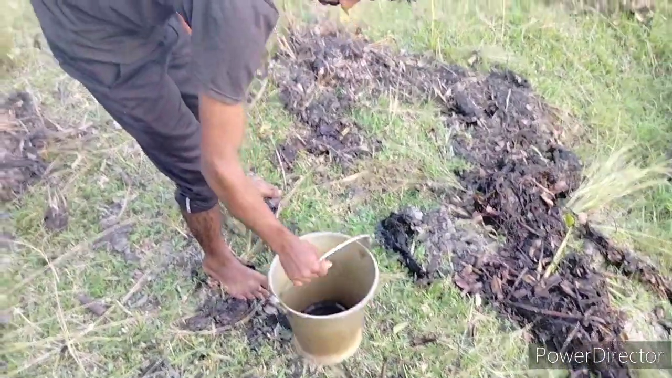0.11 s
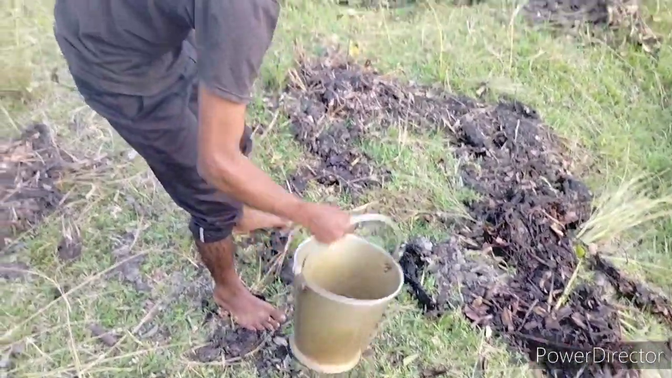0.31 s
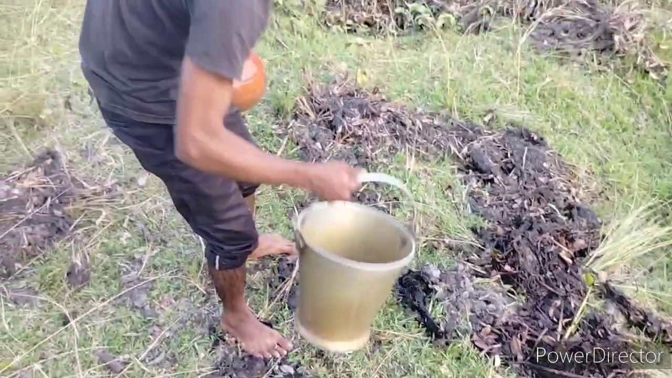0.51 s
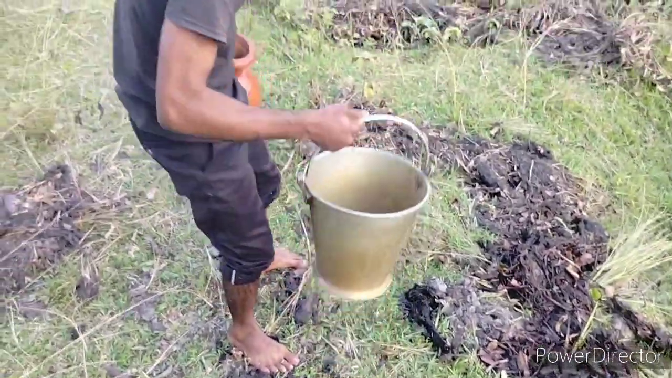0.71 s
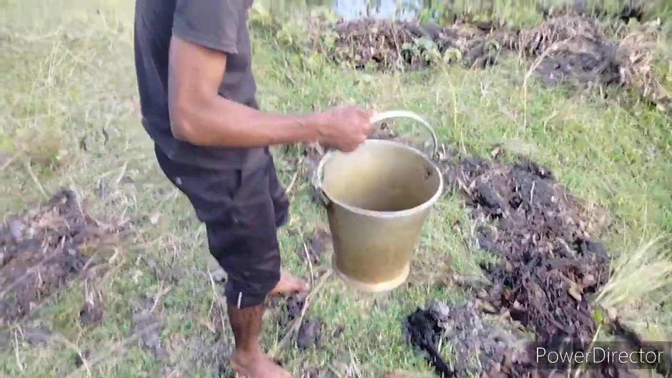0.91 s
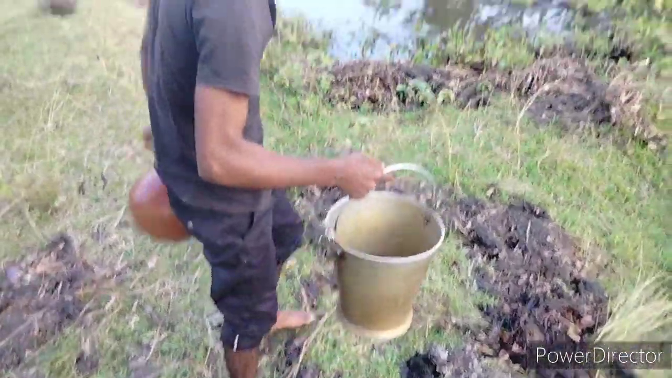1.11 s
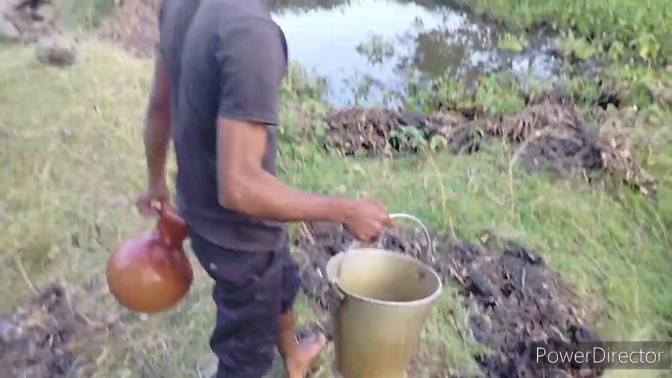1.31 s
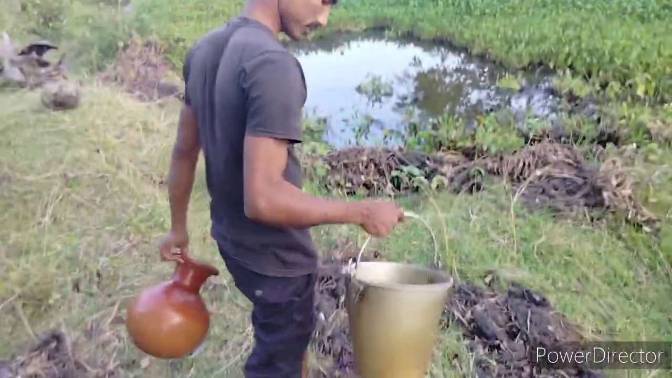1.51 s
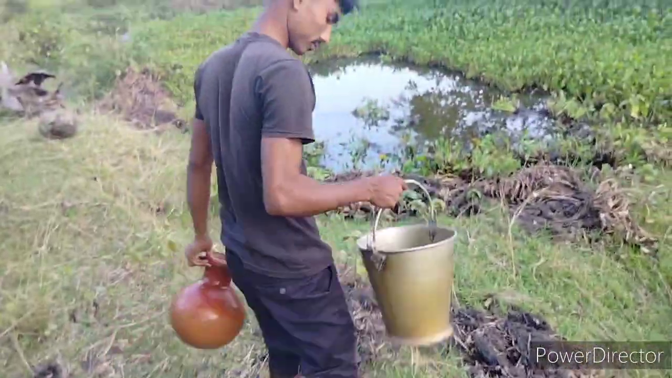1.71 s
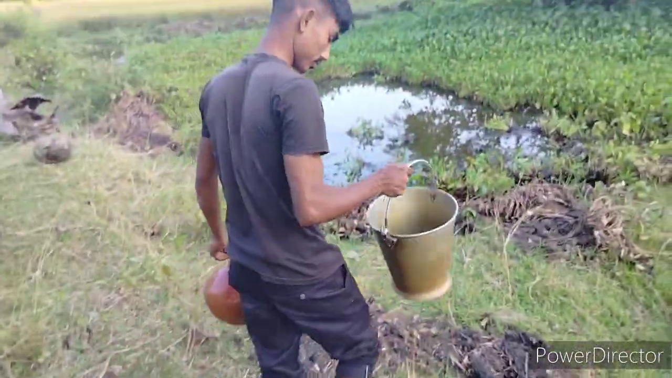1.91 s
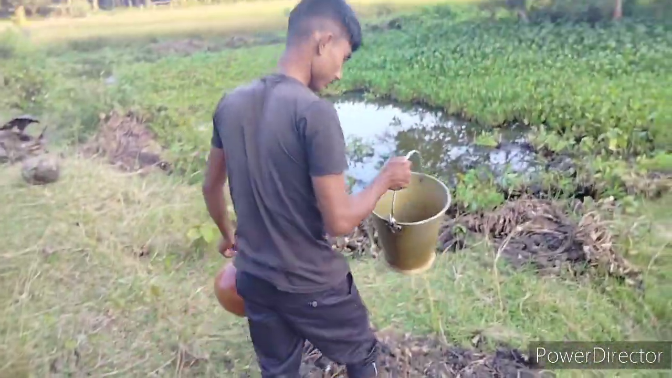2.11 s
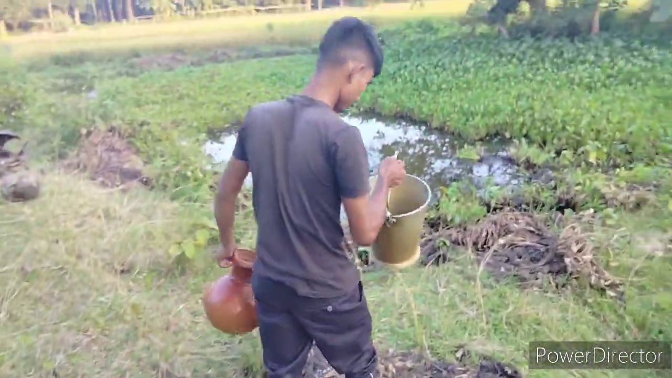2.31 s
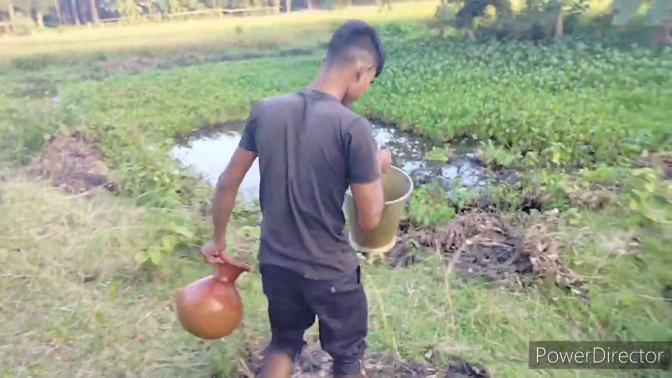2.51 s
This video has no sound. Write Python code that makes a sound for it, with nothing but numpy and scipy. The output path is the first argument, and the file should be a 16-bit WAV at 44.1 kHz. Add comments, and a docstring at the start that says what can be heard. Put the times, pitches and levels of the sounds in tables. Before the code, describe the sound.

Close up outdoors, a tin pail is lifted: soft rasp and low thud, a sharp short clank with a tiny bounce, then light ticks, a thin cricket, buzzing insects and a faint falling bird whistle.

```python
"""A tin pail is lifted off the grass near a phone, beside a pond. First its wire handle scrapes and squeals in the
lugs and the pail thuds low (grains ringing the pail, rasp, narrow noise), then the handle snaps tight with a clank
at 0.2 s (decaying modes over a noise crash) and bounces. A thin cricket wavers as a sine until 1.3 s, and small
knocks follow the pail as short resonances. Patchy treble noise swells and fades; a bird whistles three falling
notes from 1.85 s, sines with echoes. Throughout, insects hiss and buzz in shaped noise over a wash and a low hum."""
import sys
import numpy as np
from scipy import signal
from scipy.fft import rfft, irfft, next_fast_len
from scipy.io import wavfile
from scipy.ndimage import uniform_filter1d, map_coordinates

SR = 44100
rng = np.random.default_rng(int(sys.argv[2]) if len(sys.argv) > 2 else 0)


def dump(signal):
    """Clip the signal to [-1, 1] and save it as 16-bit WAV at the path in sys.argv[1]."""
    limited = np.clip(np.atleast_2d(signal).T, -1, 1)
    pcm = np.round(limited * 32767).astype(np.int16)
    wavfile.write(sys.argv[1], SR, pcm)


N = 114660  # samples, 2.6 s
TIME = np.arange(N) / SR  # seconds


def amp(db):
    """Decibels to gain."""
    return 10 ** (np.asarray(db) / 20)


def unit(x):
    """Scale to rms 1."""
    return x / np.sqrt(np.mean(x ** 2) + 1e-20)


def along(points, hz):
    """Read (Hz, value) points on a log frequency axis."""
    point_hz, values = np.transpose(points)
    return np.interp(np.log(hz + 1), np.log(point_hz + 1), values)


def curves(rows):
    """One value per sample for each column after the time."""
    seconds, *columns = np.transpose(rows)
    return [np.interp(TIME, seconds, column) for column in columns]


def wobble(rate):
    """A smooth random curve with this many knots a second."""
    knots = rng.standard_normal(int(N * rate / SR) + 4)
    return map_coordinates(knots, [np.arange(N) * rate / SR])


def swell(start, length, sharp):
    """A half-sine envelope raised to a power; a smaller power gives a flatter top."""
    phase = np.clip((TIME - start) / length, 0, 1)
    return np.sin(np.pi * phase).clip(0) ** sharp


def filtered(x, response):
    """Multiply the spectrum of x by a complex response of frequency."""
    size = next_fast_len(N + SR // 2)
    return irfft(rfft(x, size) * response(np.fft.rfftfreq(size, 1 / SR)), size)[..., :N]


def narrow(hz, width_hz):
    """Noise in a bell-shaped band around one frequency, rms 1."""
    return unit(filtered(rng.standard_normal(N), lambda f: np.exp(-((f - hz) / width_hz) ** 2)))


def pan(db):
    """Left and right gains that differ by db."""
    return amp([[db / 2], [-db / 2]])


def ports(x, lean, lead):
    """Split level (dB) and phase (radians) differences between the two microphone ports."""
    side = np.array([[.5], [-.5]])
    return filtered(x, lambda hz: amp(side * along(lean, hz)) * np.exp(1j * side * along(lead, hz)))


CRASH_ALIKE = 0.864  # shared share of power at the two ports


def metal_noise(spectrum):
    """Dense metal modes as coloured noise, a little different at each port."""
    shared, left, right = filtered(rng.standard_normal((3, N)), lambda hz: amp(along(spectrum, hz)))
    own = np.array([left, right])
    return unit(np.sqrt(CRASH_ALIKE) * shared + np.sqrt(1 - CRASH_ALIKE) * own)


# Likeness of open air at the two ports. Each row: frequency in Hz, likeness from 0 to 1.
AIR_ALIKE = [(60, 0.88), (240, 0.69), (950, 0.039)]
# Lean of open air between the ports. Each row: frequency in Hz, left minus right in dB.
AIR_LEAN = [(300, 0.46), (8000, 7.6), (13000, 3.064)]


def rush(spectrum, patchy_db):
    """Outdoor stereo noise with patches of random gain, steadier in the bass, rms 1 in the middle."""
    hz, _, bins = signal.stft(rng.standard_normal((2, N)), SR, nperseg=512)
    patches = uniform_filter1d(rng.standard_normal(bins.shape[1:]), size=2, axis=0)
    patches = unit(uniform_filter1d(patches, size=8, axis=1))
    steadier_bass = (hz / (hz + 300))[:, None]
    pair = signal.istft(bins * amp(patchy_db * patches * steadier_bass), nperseg=512)[1][:, :N]

    def mid_and_side(hz):
        turn = np.arccos(np.clip(along(AIR_ALIKE, hz), 0, 1)) / 2
        return amp(along(spectrum, hz)) * [np.cos(turn), np.sin(turn)]

    mid, side = filtered(pair, mid_and_side)
    both = ports(np.array([mid + side, mid - side]), AIR_LEAN, [(1, 0)])
    return both / np.std(both.mean(axis=0))


RISE_S = 0.00064  # time constant of a blow's onset


def ring(modes, scatter_db):
    """One blow excites decaying sine modes, each with a random change of level."""
    t = np.arange(SR // 2) / SR
    out = np.zeros(len(t))
    for hz, db, t60 in modes:
        level_db = db + scatter_db * rng.standard_normal()
        out += amp(level_db - 60 * t / t60) * np.sin(2 * np.pi * hz * t)
    return out * (1 - np.exp(-t / RISE_S))


# Handle striking the lugs. Each row: start in seconds, handle ring, pail ring and crash levels in dB.
BLOWS = [(0.028, -69, -50.5, -61), (0.138, -66, -54, -54.5), (.183, -52, -48, -42.5),
         (0.2029, -32.5, -59, -43.5), (0.2053, -10, -36.5, -16.5), (0.2125, -19, -51, -27),
         (0.246, -41.5, -43.5, -35)]
# Wire handle modes. Each row: frequency in Hz, relative level in dB, 60 dB decay in seconds.
HANDLE = [(3796, -21.5, 0.0628), (4876, 0, 0.03), (5188, -14, .03), (5754, -5, 0.038), (6098, -3, 0.022),
          (7350, -5, .03), (8300, -9, .02), (12683, -20, 0.021), (14715, -26, .045)]
# Pail modes. Each row: frequency in Hz, relative level in dB, 60 dB decay in seconds.
PAIL = [(994.6, -5.5, 0.1), (1080, -0.5, 0.081), (1406.7, 1.5, 0.0747), (1460, -5, 0.052),
        (1676, -1, 0.065), (2005.7, -3, 0.077), (2117.4, -1, .12), (2238, 1.5, 0.079)]
# Colour of the clank's dense modes. Each row: frequency in Hz, relative level in dB.
CRASH = [(250, -60.5), (722, -41.5), (1400, -14.5), (4120, -20.5), (4860, -3.5), (7540, -10.5),
         (9580, -24.5), (15100, -30), (16000, -62)]
CRASH_T60, CRASH_TAIL_T60, CRASH_TAIL_DB = 0.035, 0.14, -22  # seconds, seconds, dB under the first decay


def blows():
    """Each blow rings handle and pail modes over a two-stage decaying crash of dense modes."""
    rings, crash_gain = np.zeros(N + SR), np.zeros(N + SR)
    t = np.arange(SR // 2) / SR
    crash_decay = amp(-60 * t / CRASH_T60) + amp(CRASH_TAIL_DB - 60 * t / CRASH_TAIL_T60)
    for start, handle_db, pail_db, crash_db in BLOWS:
        span = slice(round(start * SR), round(start * SR) + len(t))
        rings[span] += amp(handle_db) * ring(HANDLE, scatter_db=0.5)
        rings[span] += amp(pail_db) * ring(PAIL, scatter_db=3)
        crash_gain[span] += amp(crash_db) * crash_decay
    return rings[:N] + crash_gain[:N] * amp(3 * wobble(250)) * metal_noise(CRASH)


# Handle rubbing in the lugs. Each row: time in seconds, excited pail level in dB, rasp level in dB.
SCRAPE = [(.02, -62.5, -62.5), (.032, -54, -62), (.16, -50, -58), (.26, -51, -46), (.3, -56, -61.5),
          (.45, -78.5, -83.5)]
# Colour of the rasp. Each row: frequency in Hz, relative level in dB.
RASP = [(600, -18.5), (2300, -1), (7500, -9), (15000, -27.5)]


def scrape():
    """Rubbing grains excite the pail modes while rough metal noise rasps."""
    body_db, rasp_db = curves(SCRAPE)
    grains = rng.standard_normal(N) * amp(8.3 * wobble(120))
    body = unit(signal.fftconvolve(grains, ring(PAIL, scatter_db=2.5))[:N])
    rasp = amp(rasp_db + 2.9 * wobble(150)) * metal_noise(RASP)
    rubbing = np.arange(N) < SCRAPE[-1][0] * SR
    return (amp(body_db) * body + rasp) * rubbing


# Squeals of the wire and low thuds of the pail.
# Each row: start in seconds, length in seconds, pitch in Hz, level in dB.
SQUEALS_AND_THUDS = [(0.011, 0.029, 5770, -58), (0.0392, 0.0482, 2790, -56), (0.1095, 0.051, 2230, -47.5),
                     (0.138, 0.04, 2000, -45.5), (0.122, 0.04, 265, -64.5), (.18, .034, 275, -56.5),
                     (0.0228, 0.039, 1382, -55), (0.0814, 0.103, 5330, -61.5), (0.176, 0.015, 1020.8, -44),
                     (0.3315, 0.0584, 5416, -65)]
BLUR = 0.039  # width as a share of the pitch


def squeals_and_thuds():
    """The wire squeals and the pail thuds low, in short bands of narrow noise."""
    return sum(amp(db) * swell(start, length, sharp=0.32) * narrow(hz, BLUR * hz)
               for start, length, hz, db in SQUEALS_AND_THUDS)


# Swinging wire. Each row: time in seconds, lower pail mode in dB, upper pail mode in dB.
SING = [(.2455, -43, -38), (0.283, -57, -55), (.297, -41.5, -50.5), (.325, -62.5, -39.5),
        (.345, -72, -67.5), (.4, -79, -67)]


def sing():
    """The swinging wire keeps the two lowest pail modes sounding, so they beat."""
    t = TIME - SING[0][0]
    swinging = (t > 0) * (t < SING[-1][0] - SING[0][0])
    # zip pairs the two level curves with the first two modes
    tones = sum(amp(db) * np.sin(2 * np.pi * mode[0] * t) for db, mode in zip(curves(SING), PAIL))
    return tones * swinging


# Direction of the pail near the microphone. Each row: frequency in Hz, left minus right in dB.
LEAN = [(300, -1.5), (2400, 0), (4800, 6), (8000, -3.5), (13000, 1.5)]
# Phase between the ports for the pail. Each row: frequency in Hz, left minus right in radians.
LEAD = [(900, -0.85), (2500, -1.16), (4400, 0.81), (7000, 1.49)]


def pail():
    """Blows, rubbing, squeals, thuds and the beating ring reach both ports from one direction."""
    return ports(blows() + scrape() + squeals_and_thuds() + sing(), LEAN, LEAD)


# Small ticks and taps. Each row: start in seconds, level in dB, resonance in Hz, left minus right in dB.
TICKS = [(.56, -58, 328, 0.5), (.597, -58.5, 1887, -7.5), (.673, -41.5, 2257, 5), (.674, -43.5, 2872, -10),
         (.68, -51, 5604, 16.5), (0.786, -57, 1450, -7.5), (.904, -47.5, 2333, -11),
         (1.034, -55.5, 301.7, 2.5), (1.186, -58.5, 1995, -2.5), (1.383, -61.5, 1094, 10),
         (1.384, -59, 1824, 3.5), (2.376, -53.5, 529.4, -10.5), (2.451, -51.5, 5600, 13.5)]
TICK_T60, TICK_SHORTENS = 0.0468, 0.197  # seconds at 1 kHz; exponent towards the treble
TICK_NOISE = 0.563  # depth of the random roughness


def ticks():
    """Short rough knocks with one decaying resonance each, shorter when higher."""
    out, t = np.zeros((2, N + SR)), np.arange(SR // 4) / SR
    for start, db, hz, pan_db in TICKS:
        rough = 1 + TICK_NOISE * wobble(0.5863 * hz)[:len(t)]
        decay = amp(db - 60 * t / TICK_T60 * (hz / 1000) ** TICK_SHORTENS)
        tick = decay * np.sin(2 * np.pi * hz * t) * rough * (1 - np.exp(-t / 0.00125))
        first = round(start * SR)
        out[:, first:first + len(t)] += pan(pan_db) * tick
    return out[:, :N]


# Bird whistles. Each row: start in seconds, length in seconds, final pitch in Hz, level in dB.
WHISTLES = [(1.854, .1, 1898, -67), (2.134, 0.095, 1873, -66), (2.427, 0.0904, 1825, -69)]
DROP_HZ, DROP_S, WHISTLE_PAN_DB = 260.8, .035, 7.5  # fall in pitch, its time constant, left minus right


def bird():
    """Whistles fall exponentially to their final pitch, blurred by echoes in decaying noise."""
    notes = np.zeros(N)
    for start, length, hz, db in WHISTLES:
        pitch = hz + DROP_HZ * np.exp(-np.abs(TIME - start) / DROP_S)
        level = amp(db - 60 * (TIME - start).clip(0) + 3.5 * wobble(90))
        notes += level * swell(start, length, sharp=0.12) * np.sin(2 * np.pi * np.cumsum(pitch) / SR)
    tail = rng.standard_normal((2, SR // 4)) * amp(-60 * TIME[:SR // 4] / 0.15)
    tail /= np.linalg.norm(tail[0])
    echo = signal.fftconvolve(notes[None], tail, axes=1)[:, :N]
    return pan(WHISTLE_PAN_DB) * (notes + amp(1) * echo)


# Faint far notes. Each row: start in seconds, length in seconds, pitch in Hz, level in dB.
NOTES = [(0.415, 0.229, 433.3, -74), (0.95, 0.055, 457, -73), (1.296, 0.0528, 923, -70),
         (1.4, 0.07, 1918, -74), (2.259, 0.32, 649, -79.5), (1.735, 0.04, 5650, -72),
         (1.95, .06, 5780, -74), (2.136, 0.0335, 5440, -73), (0.867, 0.0363, 1290, -76.5)]
NOTE_BLUR = 0.0412  # width as a share of the pitch


def far_notes():
    """Faint far notes as narrow noise, their pitch blurred."""
    notes = sum(amp(db) * swell(start, length, sharp=0.27) * narrow(hz, NOTE_BLUR * hz)
                for start, length, hz, db in NOTES)
    return pan(8.13) * notes


# Cricket level. Each row: time in seconds, level in dB.
CRICKET = [(.36, -82), (.5, -73), (1.12, -70.5), (1.15, -86.5), (1.2, -74.5), (1.3, -78)]
CRICKET_HZ, CRICKET_RISE_HZ_PER_S, CRICKET_PAN_DB = 2891, 69, 8


def cricket():
    """A thin sine rises slowly in pitch while pitch and level waver."""
    pitch = CRICKET_HZ + CRICKET_RISE_HZ_PER_S * TIME + 60 * wobble(60)
    level = amp(curves(CRICKET)[0] + 3.2 * wobble(80)) * (TIME < CRICKET[-1][0])
    return pan(CRICKET_PAN_DB) * level * np.sin(2 * np.pi * np.cumsum(pitch) / SR)


# Swells of the buzzing insect. Each row: end in seconds, level in dB.
BUZZ = [(.81, -78), (1.035, -70.5), (1.27, -65), (1.509, -63.5), (2.449, -67), (2.68, -63)]
BUZZ_HZ, BUZZ_WIDTH_HZ, BUZZ_PAN_DB = 10150, 160, 13
BUZZ_RATE, BUZZ_SHARP = 102, .8  # mean pulses a second, peakedness of each pulse
BUZZ_SWELL_S, BUZZ_REST_DB = 0.1463, -82.5  # rise of a swell, level underneath


def buzz():
    """Narrow treble noise pulses quickly; each swell rises and stops short."""
    pulses = np.exp(BUZZ_SHARP * np.cos(2 * np.pi * np.cumsum(BUZZ_RATE + 2 * wobble(5)) / SR))
    level = np.full(N, amp(BUZZ_REST_DB))
    for end, db in BUZZ:
        rise = np.clip(1 + (TIME - end) / BUZZ_SWELL_S, 0, 1) ** 1.02
        stop = np.clip((end - TIME) / 0.00516, 0, 1)
        level += amp(db) * rise * stop
    return pan(BUZZ_PAN_DB) * level * unit(pulses * narrow(BUZZ_HZ, BUZZ_WIDTH_HZ))


# Insect chorus over the pond. Each row: time in seconds, level in dB.
CHORUS = [(0.5, -70.5), (1.36, -66.5), (2.6, -65)]
# Colour of the chorus. Each row: frequency in Hz, relative level in dB.
INSECTS = [(6800, -34.5), (7500, -3), (8400, 1), (9300, -6), (10200, -1.5), (10600, -40)]


def chorus():
    """Many insects merge into a hiss of treble noise."""
    return amp(curves(CHORUS)[0] + 1.1 * wobble(33)) * rush(INSECTS, patchy_db=1)


# Swells of patchy treble hiss. Each row: start in seconds, length in seconds, level in dB.
HISS_SWELLS = [(1.46, 0.1714, -72.5), (1.595, 0.45, -79), (2.307, 0.2404, -66.5)]
# Colour of the treble hiss. Each row: frequency in Hz, relative level in dB.
HISS = [(2500, -35), (4500, -1), (10000, -5), (15400, -16), (16000, -58)]


def hiss_swells():
    """Patchy treble noise swells and fades."""
    level = sum(amp(db) * swell(start, length, sharp=0.87) for start, length, db in HISS_SWELLS)
    return level * amp(1.5 * wobble(150)) * rush(HISS, patchy_db=7.5)


# A far engine. Each row: frequency in Hz, level halfway through in dB, growth in dB per second.
HUM = [(55, -85.5, 6.5), (109.7, -82, 3)]


def hum():
    """A far engine hums in two narrow bands of noise that grow steadily."""
    from_middle = (np.arange(N) - N / 2) / SR
    return sum(amp(db + growth_db * from_middle) * narrow(hz, 8.6) for hz, db, growth_db in HUM)


# Colour of the distant wash. Each row: frequency in Hz, relative level in dB.
FIELD = [(20, -32), (55, -9), (115, 1.5), (253, -11), (560, -6.5), (850, -11.5), (4100, -18), (4750, -11.5),
         (5400, -18.5), (6300, -13.5), (10300, -27), (10700, -53), (14500, -39.5)]
FIELD_DB = -70.5


def wash():
    """The distant outdoors as steady-level patchy noise."""
    return amp(FIELD_DB) * rush(FIELD, patchy_db=4.5)


def scene():
    """All sources, from the pail close by to the distant wash."""
    near = pail() + ticks()
    animals = bird() + far_notes() + cricket() + buzz() + chorus()
    return near + animals + hiss_swells() + hum() + wash()


TOP_HZ = 16400  # the phone's band limit


def record(dry):
    """The phone thins the bass around and below 40 Hz and keeps nothing above its band limit."""
    return filtered(dry, lambda hz: (hz < TOP_HZ) * 1j * hz / (40 + 1j * hz))


dry = scene()
out = record(dry)
dump(out)
```